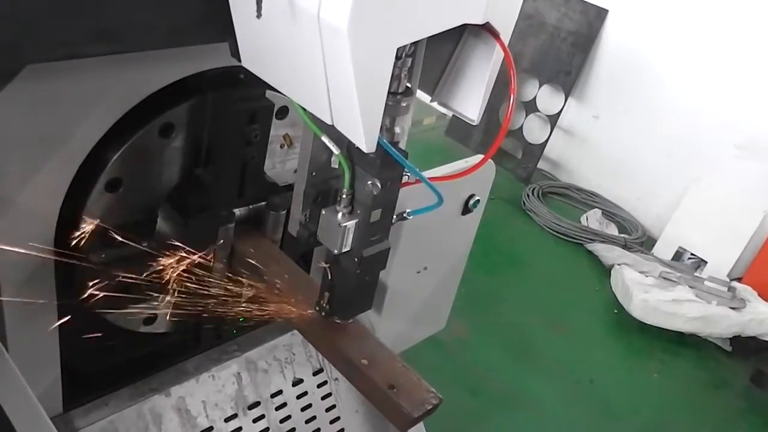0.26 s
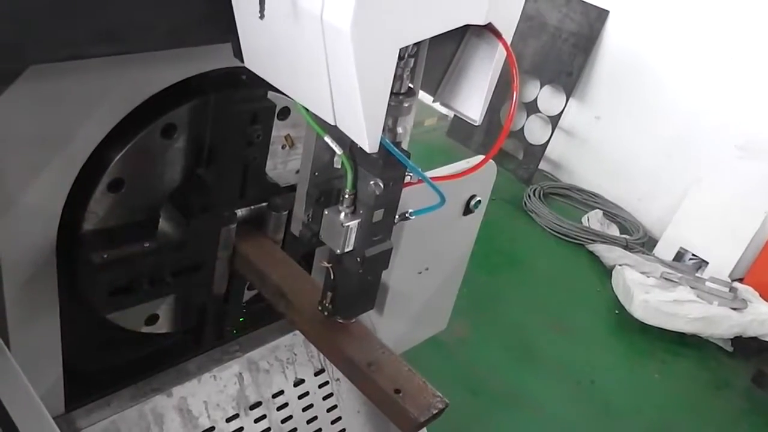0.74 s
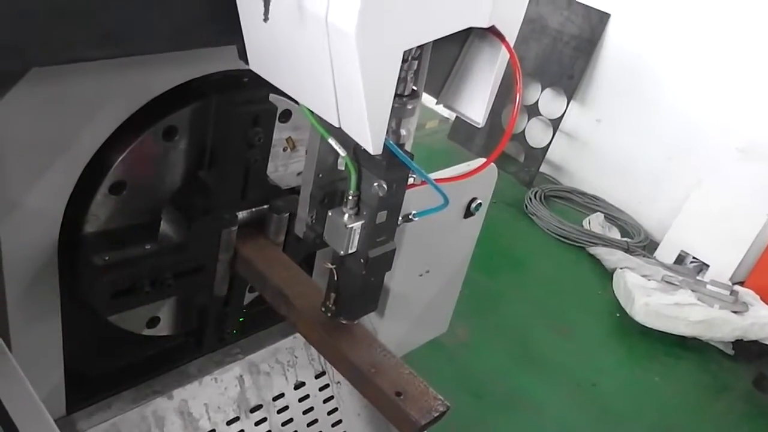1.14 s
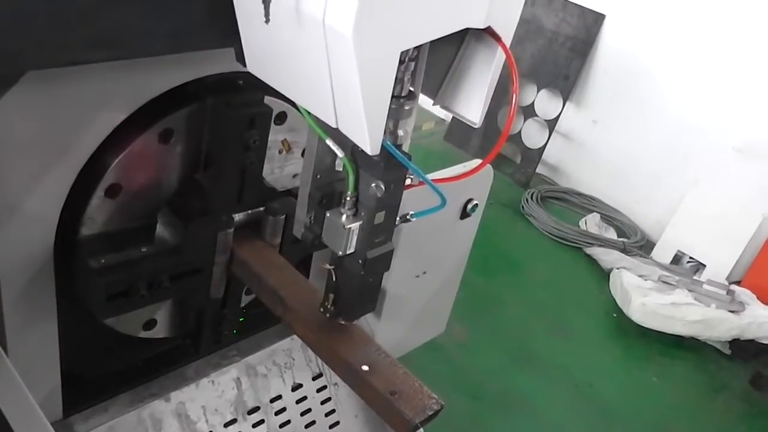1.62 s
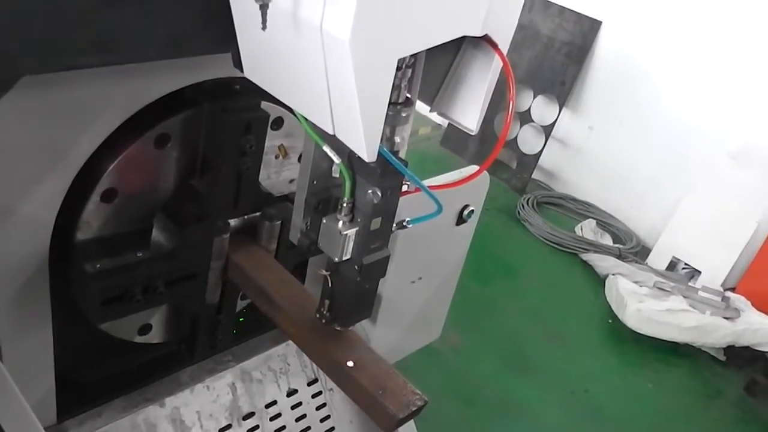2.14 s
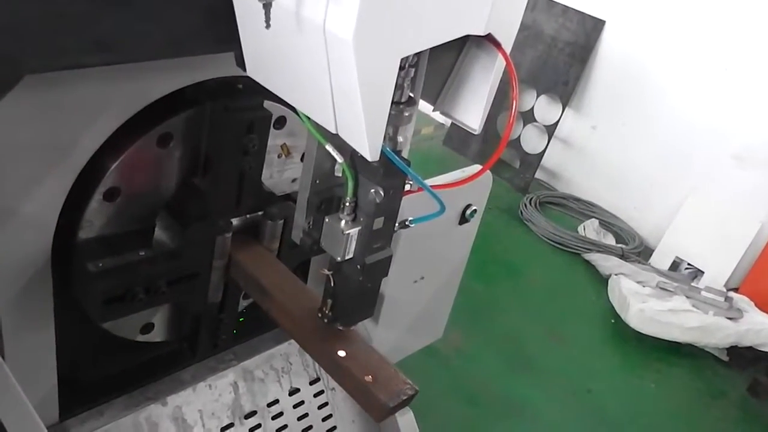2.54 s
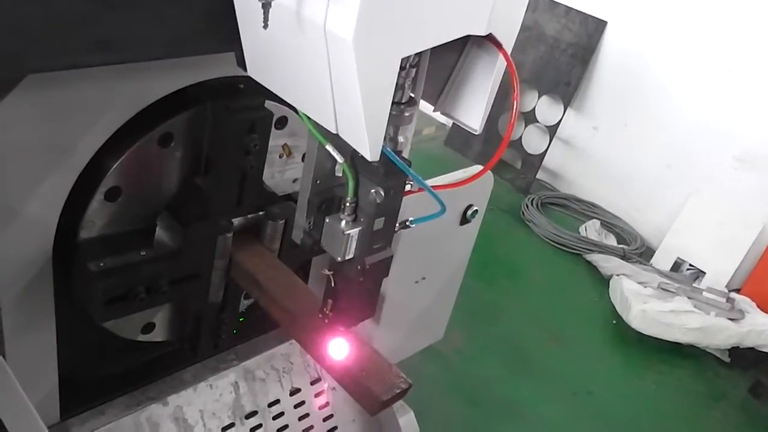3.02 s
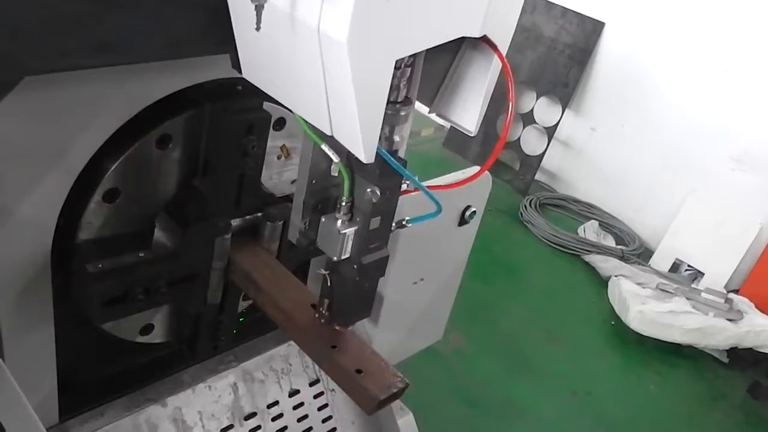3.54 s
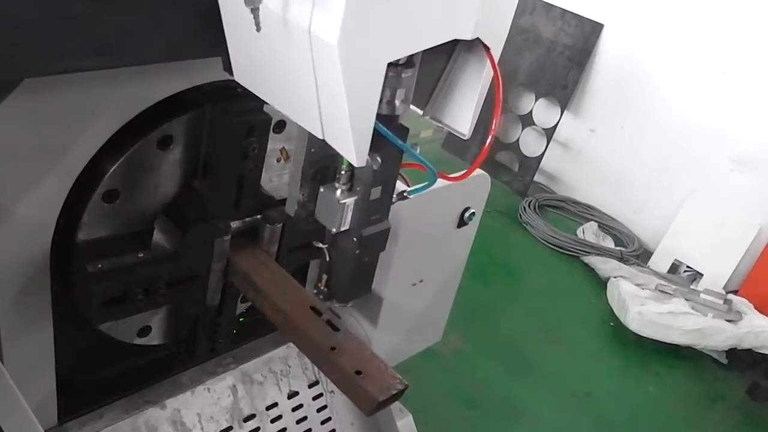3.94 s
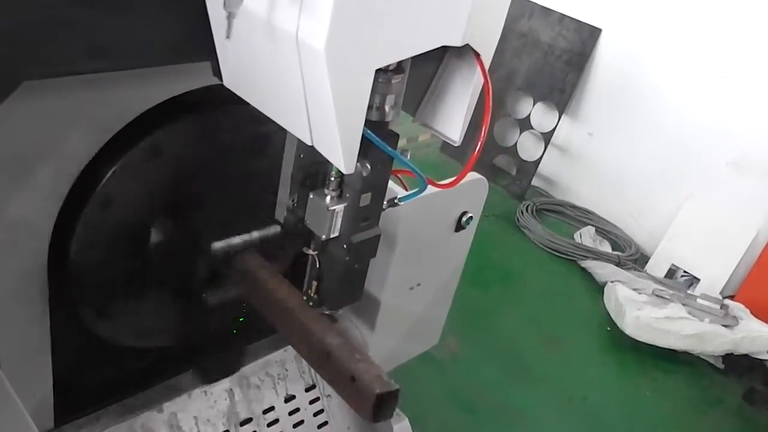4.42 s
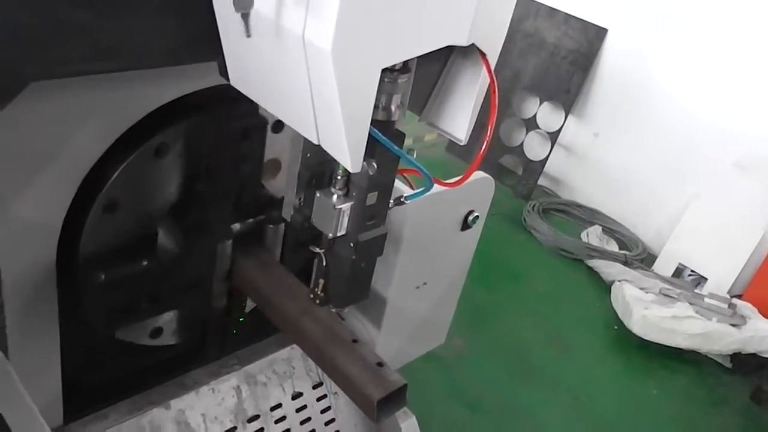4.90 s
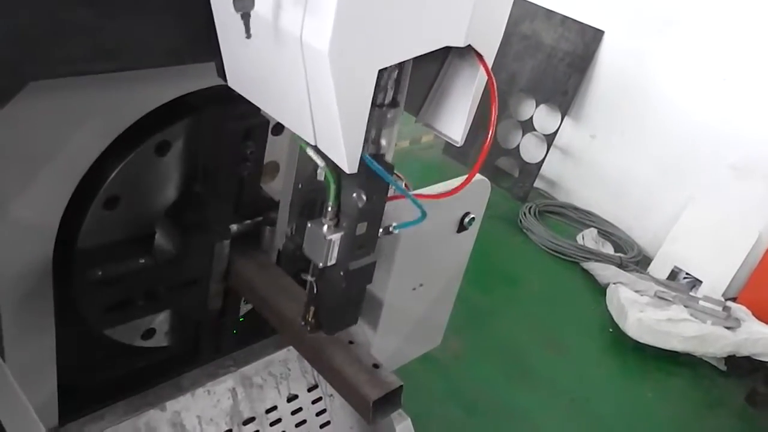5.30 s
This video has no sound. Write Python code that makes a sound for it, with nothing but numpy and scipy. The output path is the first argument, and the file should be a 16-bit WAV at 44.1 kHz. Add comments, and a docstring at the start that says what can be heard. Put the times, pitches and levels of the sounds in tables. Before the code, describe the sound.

Close by in a workshop, gas hisses loudly and steadily from a laser cutter's nozzle and roars hollowly down a steel tube, over faint machine throbbing. After about four seconds the hiss turns gusty and slightly whistling as a low rumble builds. Three quick spits of air set steel ringing as the hiss drops away. A brief, high squeal follows, and a swelling motor hum finishes.

```python
"""Gas hisses from the nozzle of a laser tube cutter and roars down the steel tube, over the beat
of a compressor, a moaning duct and the wash of a workshop. The hiss is a turbulent jet; the roar
rings the tube's air modes. The gas dies away as the head lifts, and the chuck turns with a rumble
and a hum. A valve spits three times, setting steel parts ringing, and a rubbing bearing squeals."""
import sys
import numpy as np
from scipy import signal
from scipy.fft import rfft, irfft
from scipy.io import wavfile
from scipy.ndimage import uniform_filter1d

SR = 44100
rng = np.random.default_rng(int(sys.argv[2]) if len(sys.argv) > 2 else 0)


def generate_wav(sig):
    """Save sig (samples, or channels by samples) to the path in sys.argv[1] as 16-bit PCM at SR."""
    pcm = np.round(np.clip(np.atleast_2d(sig).T, -1, 1) * 32767).astype(np.int16)
    wavfile.write(sys.argv[1], SR, pcm)


N = 245195

# time_s, level_db, top_treble_db, head_lift (0-1)
JET_CURVE = [(0, -16.5, 6.5, 0.28), (1.1, -16.5, 5, 0.26), (2.08, -16.5, 5.5, 0.13),
             (3.5, -17.5, 4.5, 0.18), (3.74, -17, 4, 0.47), (3.84, -15.5, -0.5, 0.67),
             (4.0, -16.5, -2, 0.68), (4.13, -22.5, -1, 0.47), (4.3, -23, 0.5, 0.45), (4.7, -24.5, 1, 0.38),
             (4.92, -24.5, 3.5, 0.33), (4.95, -25, 2, 0.5), (5.084, -39.5, -16, 0.6), (5.3, -41, -8, 0.6),
             (5.45, -34.5, -7, .47), (5.56, -33.5, -14, 0.7)]
# head down: freq_hz, density_db
CUTTING_SPECTRUM = [(1290, -65), (2200, -19), (2390, -52), (2580, -20), (3140, -22), (3710, -10.5),
                    (4130, -12), (4460, -8), (5670, -8), (6750, -1), (7970, -2), (8660, 2.5), (11000, -8),
                    (14700, -11.5), (16000, -15.5)]
# head lifted: freq_hz, density_db
LIFTED_SPECTRUM = [(1290, -41), (2200, -6), (2940, -6), (3390, -11.5), (3710, -5), (4960, -4), (5440, -8),
                   (7030, -5.5), (8440, -11.5), (15100, -10), (16000, -23)]
# mostly as the tube turns under the jet: centre_s, rise_db, half_width_s, top_treble_db, low_treble_db
GUSTS = [(3.628, -.5, .04, -5, 3), (3.823, -0.5, 0.088, -2.5, -9.5), (4.22, 0.9, 0.075, 2, 4),
         (4.392, 6.5, 0.057, -2, -1.5), (4.51, 7, 0.061, 4, -2), (4.62, 5.5, 0.053, -3, 5),
         (4.834, 5.5, 0.065, 3.5, -3.5)]
# the level dips briefly: centre_s, change_db, half_width_s
LEVEL_DIPS = [(.23, -1, .026), (0.576, -2.5, 0.024), (1.158, -1, .024), (1.706, -2.5, .025),
              (1.973, -3, 0.037), (2.142, -1.5, 0.039), (2.264, -2.5, 0.025), (2.577, -1, 0.027),
              (2.925, -1, .03), (3.04, -1.5, .029), (3.447, -2, 0.025), (3.586, 0.5, .017)]

def nozzle_hiss(t):
    """Turbulent jet: a wide hiss that narrows towards a whistle as the head lifts."""
    centre_s, rise_db, half_width_s, gust_top_db, gust_low_db = np.transpose(GUSTS)

    def shape(hz, time_s):
        _, top_db, lift = columns(JET_CURVE, time_s)
        top_db = top_db + bumps(time_s, zip(centre_s, gust_top_db, half_width_s))
        low_db = -0.67 + bumps(time_s, zip(centre_s, gust_low_db, half_width_s))
        top_band = np.clip(np.log2(hz / 8000 + 1e-3), 0, 1)
        low_band = resonance(hz, 4150, width_hz=3200)
        jet_db = (1 - lift) * at_hz(CUTTING_SPECTRUM, hz) + lift * at_hz(LIFTED_SPECTRUM, hz)
        whistle_db = 10 * lift ** 2 * resonance(hz, 7250, width_hz=920)
        return gain_of(jet_db + top_db * top_band + low_db * low_band + whistle_db)
    level_db = columns(JET_CURVE, t)[0] + bumps(t, LEVEL_DIPS)
    level_db += bumps(t, zip(centre_s, rise_db, half_width_s))
    return gain_of(level_db) * shaped_noise(shape, fft_size=512, patchy_db=1, flutter_db=0.5, spread=0.63)


# time_s, level_db, brightness (0-1)
ROAR_CURVE = [(0, -24.5, 0.32), (.54, -29.5, .43), (1.31, -32, 0.6), (2.0, -30.5, 0.2), (2.8, -21.5, 0.59),
              (3.43, -21, 0.82), (3.66, -20.5, 0.86), (3.85, -30, 0.72), (4.0, -28.5, 0.76),
              (4.23, -23, 0.85), (4.36, -20, 0.55), (4.46, -30.5, 0.25), (4.63, -21, 0.3),
              (4.71, -24, 0.23), (4.88, -28.5, 0.08), (4.99, -38, 0.7), (5.04, -27, 0.35), (5.2, -43, 0.2),
              (5.42, -31.5, 0.15), (5.56, -40, .4)]
# freq_hz, density_db
DULL_ROAR_SPECTRUM = [(260, -51), (450, -25.5), (585, -24), (620, 6.5), (678, -1), (799, 2), (854, -4.5),
                      (973, -5), (1970, -4), (2360, -13), (3200, -9), (4160, -12), (7040, -120)]
# freq_hz, density_db
BRIGHT_ROAR_SPECTRUM = [(260, -56), (450, -30.5), (585, -31), (620, -20), (673, -15), (1090, -13.5),
                        (1370, -2), (1790, 2.5), (2460, 1), (2760, -10.5), (3200, -1.5), (4160, -15.5),
                        (7040, -120)]
# air modes of the tube: pitch_hz
AIR_MODES_HZ = [725, 815, 895, 978, 1057, 1145, 1225, 1307, 1450, 1525, 1610, 1700, 1835, 2040, 2225, 2320,
                2410, 2500, 2650]
# per air mode: width_hz, gain_db
AIR_MODE_PEAKS = [(30, -1.5), (13.9, 6), (17.9, 13), (19.9, 15), (18, 15), (20, 11.5), (30, 6), (16, 3.5),
                  (30, -2.5), (23.5, 2.5), (59.5, -2), (40, -1.5), (28, -1), (41, 0.5), (24, 2.5),
                  (30, 2.5), (30, 2), (40, 5), (30, 4.5)]

def tube_roar(t):
    """Gas roars in the tube, whose nearly evenly spaced air modes stand out of the noise."""
    def shape(hz, time_s):
        _, brightness = columns(ROAR_CURVE, time_s)
        dull_db = (1.5 - brightness) * at_hz(DULL_ROAR_SPECTRUM, hz)
        bright_db = brightness * at_hz(BRIGHT_ROAR_SPECTRUM, hz)
        modes = sum(gain_of(gain_db) * resonance(hz, pitch_hz, width_hz)
                    for pitch_hz, (width_hz, gain_db) in zip(AIR_MODES_HZ, AIR_MODE_PEAKS))
        return gain_of(dull_db + bright_db) * (1 + modes)
    level_db = columns(ROAR_CURVE, t)[0] + bumps(t, LEVEL_DIPS)
    roar = shaped_noise(shape, fft_size=4096, patchy_db=0.8, flutter_db=0.2, spread=0.25)
    return gain_of(level_db) * roar


# start_s, level_db, pitch_hz, length_s
HOOTS = [(4.3, -22, 1838, 0.079), (3.597, -22.5, 1120, 0.078), (4.616, -19, 1272, 0.077),
         (4.61, -22, 2000, 0.024), (4.611, -20, 1750, .03)]

def tube_hoots(wobble_hz=33):
    """The tube sings briefly on single modes."""
    out = np.zeros(N)
    for start_s, level_db, pitch_hz, length_s in HOOTS:
        age_s = np.arange(round(length_s * SR)) / SR
        wobble = 1 + 0.5 * sine(wobble_hz * age_s + rng.random())
        envelope = gain_of(level_db) * signal.windows.tukey(len(age_s), 0.4)
        add(out, start_s, envelope * wobble * sine(pitch_hz * age_s))
    return out


# start_s, gain_db, dullness (0-1), air_t60_s, ring_db, click_hz, click_db
SPITS = [(4.9325, -6, 0.04, 0.092, -37, 8400, -12), (5.0268, -3, 0.7, 0.17, -32, 6880, -8),
         (5.12, -18, 0.4, 0.046, -40, 3770, -9)]
# freq_hz, density_db
SPIT_SPECTRUM = [(410, -39), (700, 2), (1250, -9), (1360, -7), (2080, -19), (2660, -23), (3200, -6),
                 (5400, -8.5), (6320, 0), (15200, -31), (16000, -29)]
# modes of the steel parts: pitch_hz
STEEL_MODES_HZ = [2168, 4610, 5080, 5747, 6146, 6305, 6613, 9908, 13600]
# per steel mode: gain_db, t60_s
STEEL_MODE_DECAYS = [(0.5, 0.98), (-3, 0.64), (0.5, 0.96), (0, 0.48), (-10, 0.45), (-16, .7), (-9, 0.91),
                     (9, 0.5), (-8, .3)]

def valve_spits():
    """Each spit is a click and a burst of air that dies fast and sets the steel ringing."""
    out = np.zeros((2, N))
    age_s = np.arange(SR // 2) / SR
    hz = np.fft.rfftfreq(len(age_s), 1 / SR)
    attack = np.minimum(age_s / 0.0006, 1)
    for start_s, gain_db, dullness, air_t60_s, ring_db, click_hz, click_db in SPITS:
        mid, side = rng.standard_normal((2, len(age_s)))
        air = np.array([mid + 0.61 * side, mid - 0.61 * side])
        tilt_db = 9 * (1.5 - dullness) * np.log2(hz / 6000 + 0.1)
        air = unit_rms(irfft(rfft(air) * gain_of(at_hz(SPIT_SPECTRUM, hz) + tilt_db), len(age_s)))
        release_s = np.maximum(age_s - 0.052 * air_t60_s, 0)  # the pressure holds a moment
        burst = gain_of(-11) * decay(release_s, air_t60_s) * air
        click = gain_of(click_db) * decay(age_s, t60_s=0.031) * sine(click_hz * age_s)
        ring = 0
        for pitch_hz, (mode_db, t60_s) in zip(STEEL_MODES_HZ, STEEL_MODE_DECAYS):
            beat_hz = rng.uniform(13.3, 39.5)  # close twin modes beat
            beating = 1 + 0.51 * np.cos(2 * np.pi * (beat_hz * age_s + rng.random()))
            ring += gain_of(ring_db + mode_db) * decay(age_s, t60_s) * beating * sine(pitch_hz * age_s)
        add(out, start_s, gain_of(gain_db) * attack * (burst + click + ring))
    return pan(out, left_db=0.8)


# the low sounds hold, sink, then surge twice: time_s, level_db
LOW_SOUND_LEVEL = [(0, -35.5), (1.27, -38.5), (2.31, -37), (3.73, -40), (3.81, -50.5), (4.04, -56),
                   (4.13, -45.5), (4.46, -34), (4.53, -27.5), (4.76, -22.5), (4.82, -17.5), (4.92, -19),
                   (4.97, -25), (5.01, -22), (5.06, -35), (5.29, -26.5), (5.34, -22.5), (5.44, -17),
                   (5.56, -21)]
# freq_hz, density_db
RUMBLE_SPECTRUM = [(12, -58), (20, -24), (97, -13.5), (146, -8.5), (193, -8.5), (233, -3), (275, -10),
                   (517, -9), (557, -9), (710, -7.5), (779, -11), (1440, -21.5), (1700, -29), (2210, -59),
                   (3740, -120)]
# pitch_hz, width_hz, gain_db
FRAME_MODES = [(382, 100, -9), (523, 30, -3.5), (1390, 50, -10)]

def chuck_rumble(t):
    """Drives and chuck rumble through the frame, whose modes ring more in the last surge."""
    def shape(hz, time_s):
        frame = sum(gain_of(gain_db) * resonance(hz, pitch_hz, width_hz)
                    for pitch_hz, width_hz, gain_db in FRAME_MODES)
        frame_db = np.where(time_s < 5.1, -9.5, -4)
        return gain_of(at_hz(RUMBLE_SPECTRUM, hz)) + gain_of(frame_db) * frame
    rumble = shaped_noise(shape, fft_size=4096, patchy_db=0.5, flutter_db=1, spread=0.75)
    return gain_of(low_level_db(t)) * rumble


def low_level_db(t):
    """Rumble, knocks and motor hum sink and swell together."""
    return columns(LOW_SOUND_LEVEL, t)[0] + bumps(t, LEVEL_DIPS)


# harmonic_number, gain_db
STROKE_HARMONICS = [(1, -27), (2, -32), (3, -27), (4, -5.5), (5, -17), (6, -7), (7, -11.5), (8, -0.5),
                    (9, 4), (10, -10), (11, -7), (12, -22), (13, 2), (14, 5.5), (15, -28), (16, 2),
                    (17, -18), (18, -8), (19, -6), (20, 1.5), (21, 3.5), (22, -32), (23, -14), (24, -12),
                    (25, -1), (26, -8), (27, 5), (28, -13), (29, -34), (30, 2.5), (31, 1), (32, -20),
                    (33, -8), (34, 0.5)]

def compressor(t, stroke_hz=17.58, motor_hz=100, reference_db=-37):
    """Harmonics nearly in step make one knock a stroke, over a faint motor hum."""
    knocks = unit_rms(sum(gain_of(gain_db) * sine(harmonic * stroke_hz * t + 0.25 * rng.random())
                          for harmonic, gain_db in STROKE_HARMONICS))
    motor = gain_of(-24) * sine(motor_hz * t)
    swell_db = low_level_db(t) - reference_db
    level_db = -39.5 + np.where(swell_db < 0, 0.85, 0.68) * swell_db
    return pan(gain_of(level_db) * (knocks + motor), left_db=0.9)


# start_s, length_s, first_db, last_db
HUM_NOTES = [(3.802, .25, -48, -51), (4.6, 0.12, -34, -28), (4.77, 0.27, -29, -29), (5.03, 0.23, -42, -42),
             (5.287, 0.19, -23, -15), (5.5, .12, -14, -14)]

def chuck_hum(t, pitch_hz=238):
    """The chuck drive hums in spells: a steady tone with a fuzzy skirt."""
    tone = 0.69 * sine(pitch_hz * t) + 0.61 * fuzzy_note(pitch_hz, width_hz=10)
    return pan(tone * note_envelope(t, HUM_NOTES, fade_s=0.066), left_db=0.9)


# bearing tones: pitch_hz
SQUEAL_HZ = [9906, 5083]
# one list per tone: start_s, length_s, first_db, last_db
SQUEAKS = [
    [(5.245, 0.086, -30, -24), (5.34, 0.034, -38, -24)],
    [(5.248, 0.043, -33, -34)],
]

def bearing_squeal(t, waver_hz=12.8, ring_s=0.01):
    """Two thin wavering tones of a rubbing bearing; each squeak swells and rings out."""
    out = 0
    pole = np.exp(-1 / (ring_s * SR))
    for pitch_hz, squeaks in zip(SQUEAL_HZ, SQUEAKS):
        waver = unit_rms(uniform_filter1d(rng.standard_normal(N), 900))
        cycles = np.cumsum(pitch_hz + waver_hz * waver) / SR
        envelope = signal.lfilter([1 - pole], [1, -pole], note_envelope(t, squeaks, fade_s=0.015))
        out += np.sqrt(2) * envelope * sine(cycles)
    return pan(out, left_db=1.2)


def duct_moan(t, pitch_hz=634, fade_db_per_s=2, end_s=3.75):
    """A duct of the machine resonates on one fuzzy, slowly fading note."""
    envelope = gain_of(-38 - fade_db_per_s * t) * np.clip((end_s - t) / 0.1, 0, 1)
    return pan(envelope * fuzzy_note(pitch_hz, width_hz=22), left_db=0.9)


# freq_hz, density_db
WORKSHOP_SPECTRUM = [(12, -37), (20, -11), (498, -6), (545, -3), (619, -2), (677, -9), (1060, -7),
                     (1500, -4), (1950, -36), (3300, -120)]

def workshop_wash():
    """Far machines, arriving from all sides."""
    def shape(hz, time_s):
        return gain_of(at_hz(WORKSHOP_SPECTRUM, hz)) * np.ones(len(time_s))
    return gain_of(-46.5) * shaped_noise(shape, fft_size=2048, patchy_db=3, flutter_db=1, spread=47)


# freq_hz, coherence (0-1)
STEREO_COHERENCE = [(60, 0.78), (99, 0.99), (160, 0.91), (270, 1), (450, 0.87), (740, 0.95), (1220, 0.94),
                    (2010, 1), (3330, 1), (5500, 0.92), (9080, 0.54), (15000, 0.45)]
# freq_hz, left_over_right_db
STEREO_BALANCE = [(60, 2.0), (120, 0.5), (240, 2.5), (480, 1.5), (950, 0.5), (1890, 0), (3770, -1),
                  (7520, 2.0), (15000, 0.5)]
# freq_hz, left_lead_rad
STEREO_PHASE = [(0, 0.53), (520, 0.039), (6460, 0.036), (7410, -0.49), (8350, 0.76), (8960, 0.77),
                (9730, -1.3), (10200, 0.036), (10800, -0.96), (11200, 0.89), (12100, 0.93), (13400, -0.23),
                (14200, 0.0), (15800, -0.16)]

def shaped_noise(shape, fft_size, patchy_db, flutter_db, spread):
    """Unit-RMS stereo noise coloured by shape(hz, time_s), with drifting patches and all-band flutter."""
    hop = fft_size // 4
    frames, drift_frames = N // hop + 5, 4096 // fft_size + 2
    hz = np.fft.rfftfreq(fft_size, 1 / SR)[:, None]
    left_re, left_im, other_re, other_im, patches = rng.standard_normal((frames, len(hz), 5)).T
    patches = uniform_filter1d(patches, fft_size // 64, axis=0)
    patches = unit_rms(uniform_filter1d(patches, drift_frames, axis=1))
    flutter = unit_rms(uniform_filter1d(rng.standard_normal(frames), drift_frames))
    coherence = at_hz(STEREO_COHERENCE, hz) ** spread
    left = left_re + 1j * left_im
    right = coherence * left + np.sqrt(1 - coherence ** 2) * (other_re + 1j * other_im)
    right *= np.exp(-1j * at_hz(STEREO_PHASE, hz))
    balance = gain_of(at_hz(STEREO_BALANCE, hz) / 2)
    colour = shape(hz, np.arange(frames) * hop / SR)
    colour /= np.sqrt((colour ** 2).mean(0))  # the colour moves, the level stays
    spectra = np.array([left * balance, right / balance]) * colour
    spectra *= gain_of(patchy_db * patches + flutter_db * flutter)
    _, sound = signal.istft(spectra, nperseg=fft_size, noverlap=fft_size - hop)
    return unit_rms(sound[:, :N])


def fuzzy_note(pitch_hz, width_hz):
    """Noise through one narrow resonance."""
    band_hz = [pitch_hz - width_hz / 2, pitch_hz + width_hz / 2]
    sos = signal.butter(1, band_hz, "bandpass", fs=SR, output="sos")
    return unit_rms(signal.sosfilt(sos, rng.standard_normal(N)))


def note_envelope(t, notes, fade_s):
    """Gain of notes that fade in, slide between two levels and fade out."""
    envelope = 0
    for start_s, length_s, first_db, last_db in notes:
        end_s = start_s + length_s
        gate = np.clip(np.minimum(t - start_s, end_s - t) / fade_s + 0.5, 0, 1)
        envelope += gate * gain_of(np.interp(t, [start_s, end_s], [first_db, last_db]))
    return envelope


def bumps(t, rows):
    """Sum of bell-shaped rises and dips, in dB."""
    return sum(db * np.exp(-((t - centre_s) / half_width_s) ** 2) for centre_s, db, half_width_s in rows)


def columns(curve, t):
    """Each value column of a curve at the times t."""
    time_s, *values = np.transpose(curve)
    return [np.interp(t, time_s, column) for column in values]


def at_hz(table, hz):
    freq_hz, values = np.transpose(table)
    return np.interp(np.log(hz + 1), np.log(freq_hz + 1), values)


def resonance(hz, centre_hz, width_hz):
    return 1 / np.sqrt(1 + (2 * (hz - centre_hz) / width_hz) ** 4)


def sine(cycles):
    return np.sin(2 * np.pi * cycles)


def decay(age_s, t60_s):
    return gain_of(-60 * age_s / t60_s)


def gain_of(db):
    return 10 ** (np.asarray(db) / 20)


def unit_rms(x):
    return x / np.sqrt(np.mean(x ** 2) + 1e-20)


def pan(sound, left_db):
    return sound * gain_of([[left_db], [-left_db]])


def add(mix, start_s, sound):
    part = mix[..., round(start_s * SR):][..., :sound.shape[-1]]
    part += sound[..., :part.shape[-1]]


def scene():
    t = np.arange(N) / SR
    gas = nozzle_hiss(t) + tube_roar(t) + tube_hoots()
    machinery = compressor(t) + chuck_rumble(t) + chuck_hum(t) + duct_moan(t)
    return gas + machinery + workshop_wash() + valve_spits() + bearing_squeal(t)


def record(dry, cutoff_hz=15950):
    """A steep low-pass removes the highest treble."""
    lowpass = signal.firwin(511, cutoff_hz, window=("kaiser", 9), fs=SR)
    return signal.oaconvolve(dry, lowpass[None], "same")


dry = scene()
out = record(dry)
generate_wav(out)
```